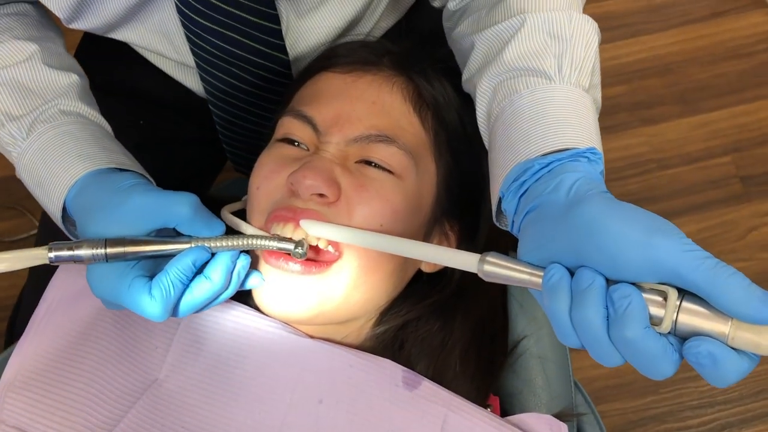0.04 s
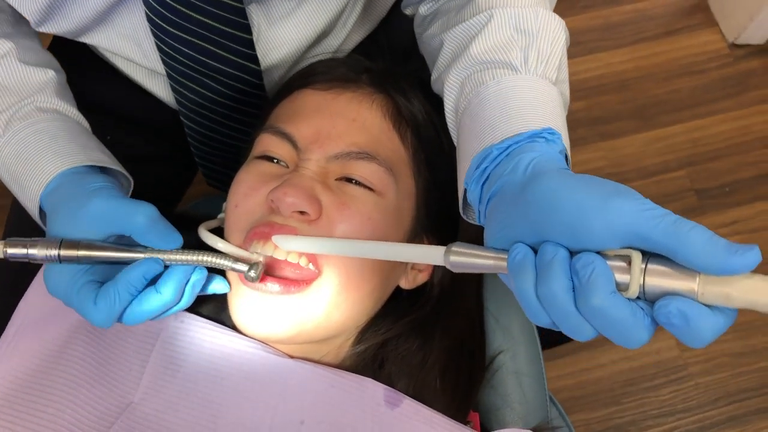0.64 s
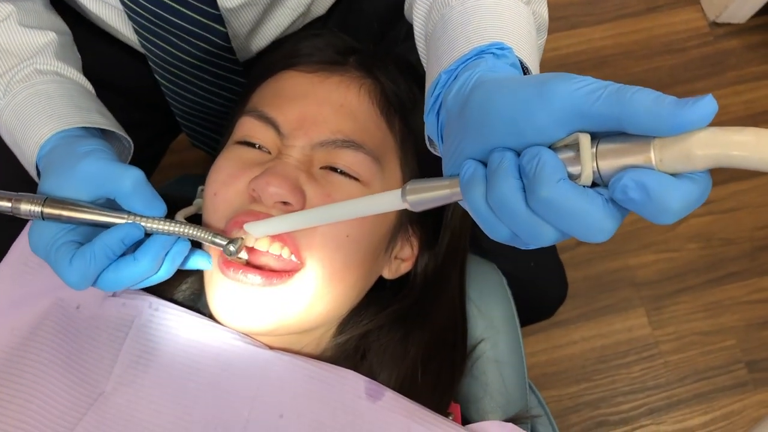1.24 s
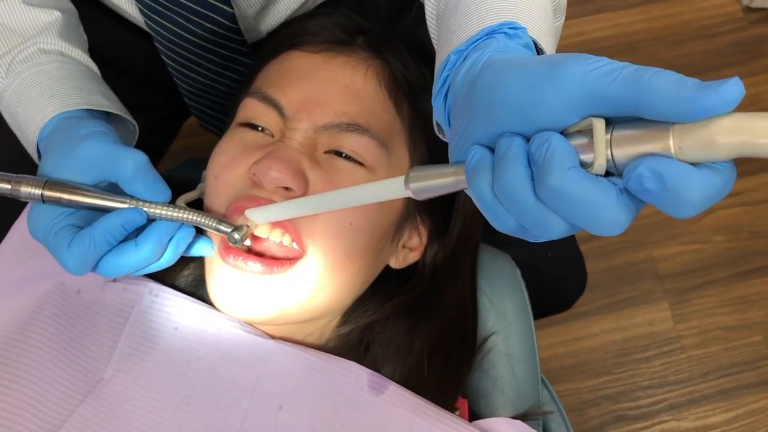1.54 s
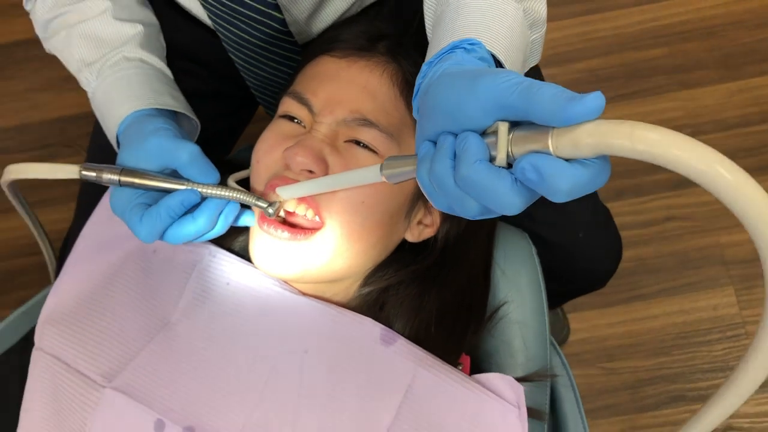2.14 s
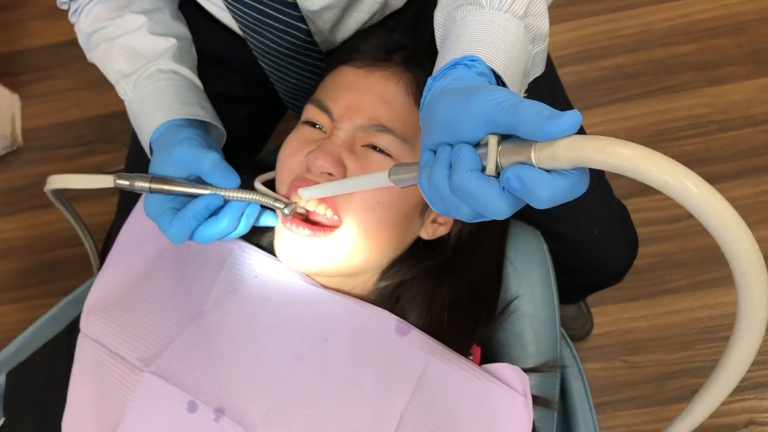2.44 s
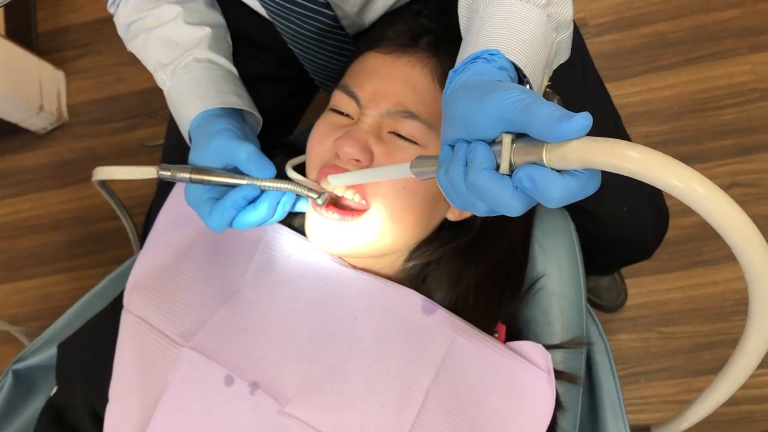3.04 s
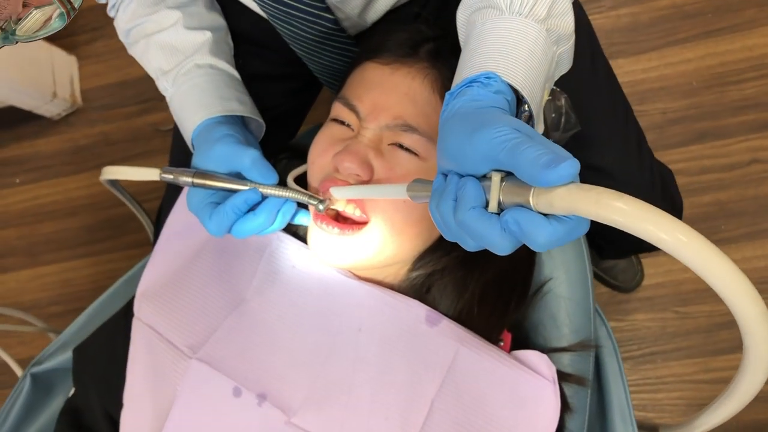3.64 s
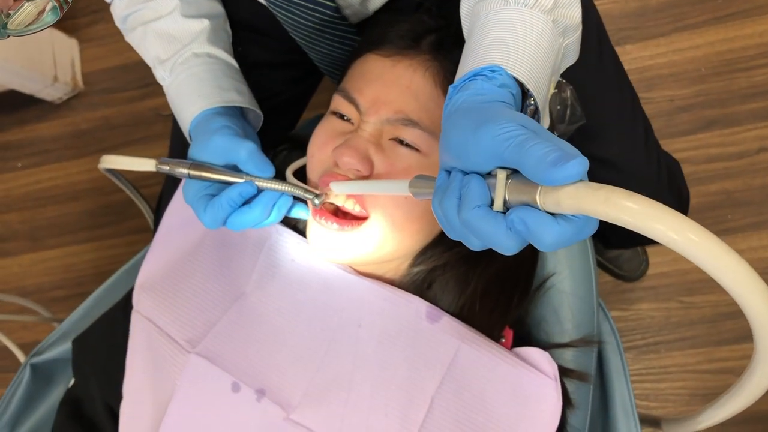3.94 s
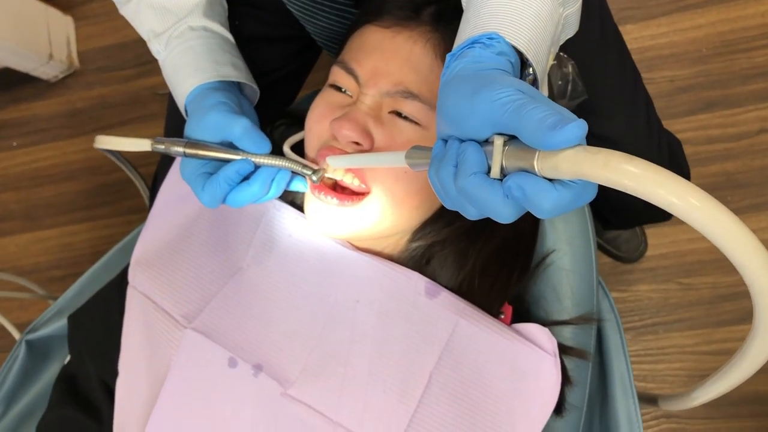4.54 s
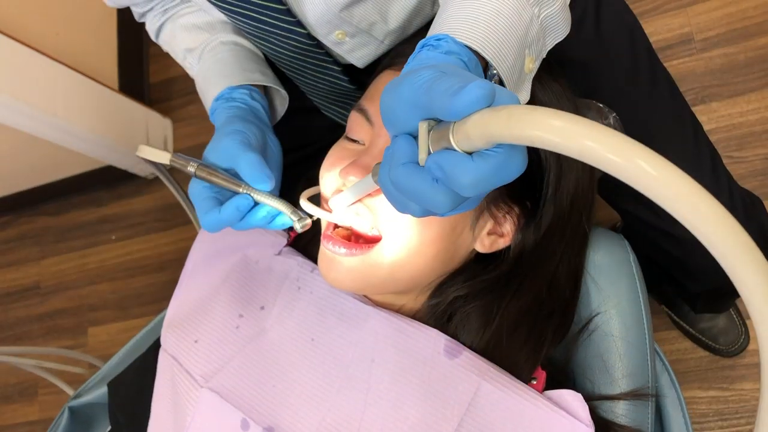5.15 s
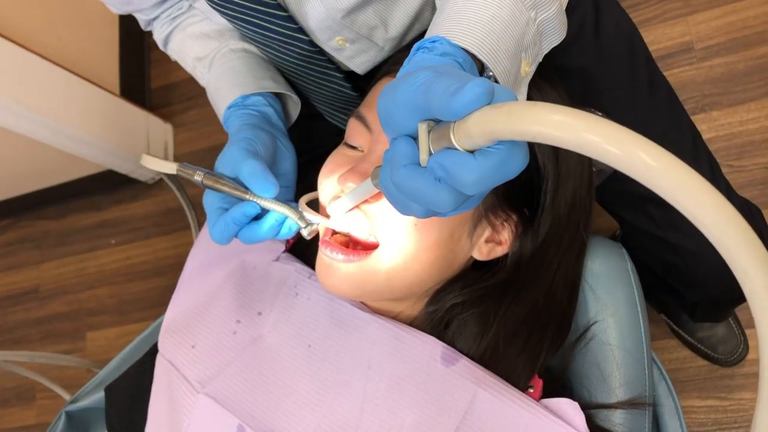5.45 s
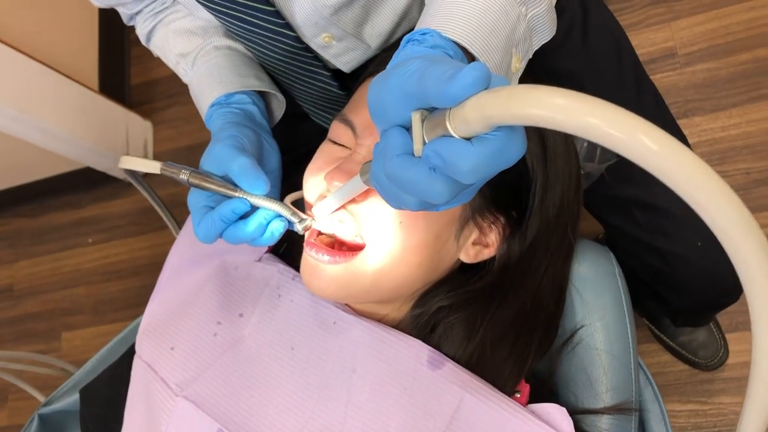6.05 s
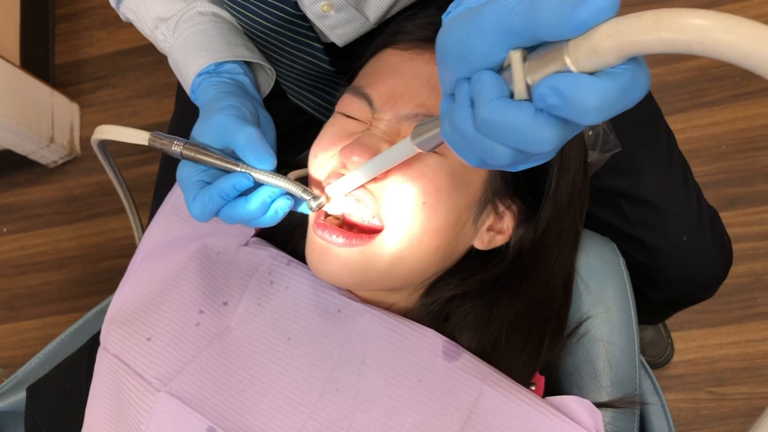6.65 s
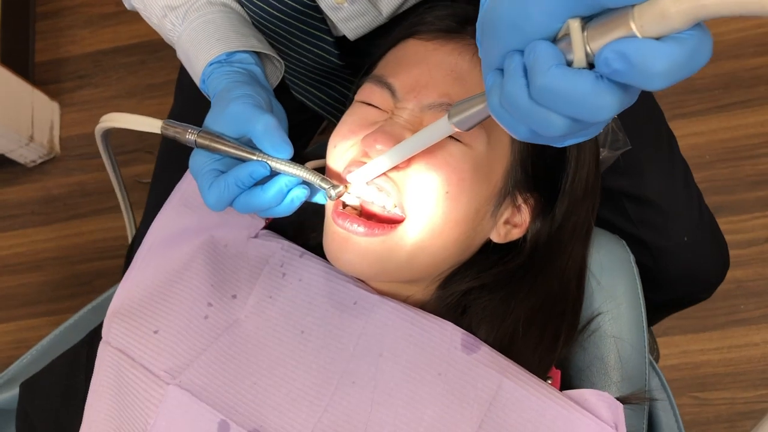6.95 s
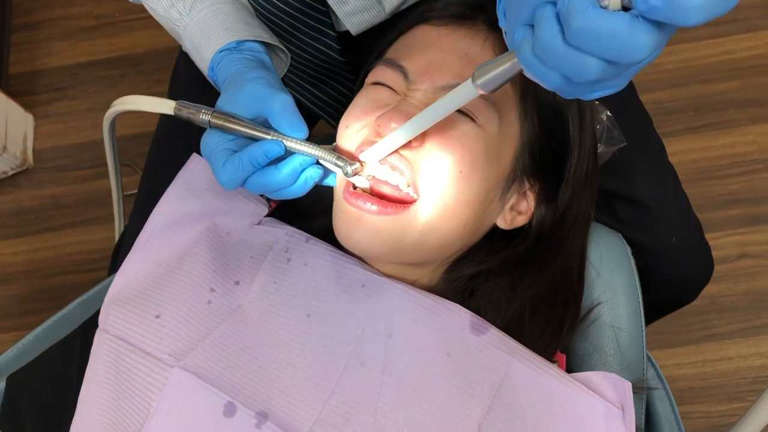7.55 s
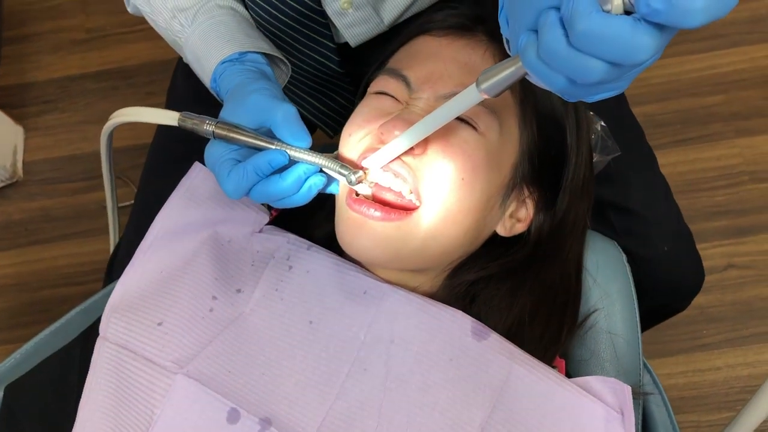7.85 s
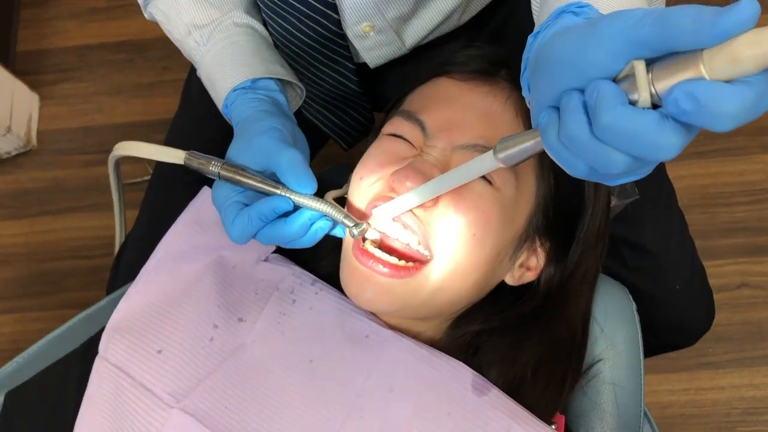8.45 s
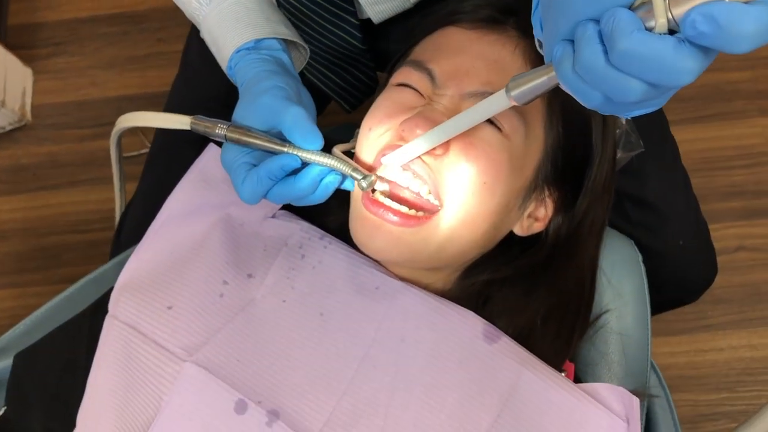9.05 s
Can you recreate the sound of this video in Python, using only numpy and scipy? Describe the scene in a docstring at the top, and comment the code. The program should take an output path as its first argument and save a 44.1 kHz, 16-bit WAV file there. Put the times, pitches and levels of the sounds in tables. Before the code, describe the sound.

From the start, a dental drill whines at a very high pitch close to the microphone, grinding glue off teeth in quick brushing strokes that each make the pitch sag. Beside it a suction tip hisses continuously, with faint whistles, tiny droplet ticks and short saliva slurps near 0.7 and 4.3 seconds. At about 4.8 seconds the drill stops and the tip settles against the lip, turning the hiss into a lower, hollow roar with a faint pump throb in the hose. At 5.6 seconds the drill spins up with a fast rising whine, stays thin and faint, then grows clearer around 7 seconds. Just after 8 seconds the tip comes free with a soft hoot and wet slurps. The brighter hiss returns and the drill strokes carry on until the end, a little past 9 seconds. Ventilation hums quietly throughout in the small clinic room.

```python
"""A small dental clinic room, a phone microphone close to the mouth. In front, an air turbine grinds
glue off teeth, its whine sagging at every stroke of the bur. Beside it a suction tip hisses and slurps.
Midway the drill lifts off and spins up again, and for about three seconds the tip lies against the lip,
where it roars lower and the pump throbs through the hose. Further off, ventilation hums."""
import sys
import numpy as np
from scipy import signal
from scipy.fft import rfft, irfft
from scipy.io import wavfile
from scipy.ndimage import uniform_filter1d

SR = 44100
rng = np.random.default_rng(int(sys.argv[2]) if len(sys.argv) > 2 else 0)


def dump_mix(stems):
    """Bounce the given channels to the path in sys.argv[1] as a 16-bit WAV at rate SR."""
    frames = np.atleast_2d(stems).T  # one column per channel
    limited = np.clip(frames, -1, 1)  # hard clip at full scale
    pcm = np.round(limited * 32767).astype(np.int16)
    wavfile.write(sys.argv[1], SR, pcm)


N = 409688
TIME = np.arange(N) / SR
FRAME_TIMES = np.arange(N // 256 + 5) * 256 / SR
BIN_HZ = np.fft.rfftfreq(1024, 1 / SR)

LIFT_S, RESTART_S = 4.822, 5.585  # the drill lifts off, then starts again from rest
LIP_FROM_S, LIP_UNTIL_S = 4.824, 8.063  # the suction tip lies against the lip

# Levels in the tables are relative; each source adds its own trim.
# steady pressure of the bur on the tooth, one table a pass: time_s, drag_hz, whine_db
FIRST_PASS = [(0, 1760, -19.5), (.33, 1370, -23.5), (.59, 1630, -10), (.65, 230, -28), (1.12, 170, -18),
              (1.17, 240, -26), (1.5, 590, -30), (1.72, 440, -19.5), (1.92, 580, -34), (2.55, 740, -35),
              (2.82, 120, -28), (3.3, 240, -29.5), (3.55, 200, -37.5), (3.71, 0, -26), (3.8, 180, -39),
              (4.04, 130, -32), (4.2, 420, -26), (4.82, 320, -30)]
SECOND_PASS = [(6.1, 60, -55), (6.5, 480, -48), (6.85, 90, -45), (6.94, 130, -25), (7.02, 260, -37),
               (7.3, 441, -30), (8.1, 490, -27.5), (8.72, 560, -31), (9.29, 140, -26.5)]
# brushing strokes of the bur, about eight a second: start_s, length_s, added_drag_hz, swell_db
BUR_STROKES = [(-0.049, 0.058, 323, 2), (0.085, 0.072, 644, 4.0), (0.233, 0.065, 520, 2),
               (0.333, 0.075, 840, 0.5), (0.45, 0.09, 845, -1), (0.552, 0.077, 840, -2.5),
               (1.143, 0.045, 980, -6.0), (1.248, 0.066, 302, 1.0), (1.371, 0.065, 510, 0.0),
               (1.74, 0.059, 360, -0.5), (1.839, 0.057, 400, 4.5), (1.947, 0.056, 630, 10.0),
               (2.043, 0.066, 500, 10.5), (2.173, 0.078, 1150, 7.5), (2.314, 0.061, 600, 5.0),
               (2.434, 0.07, 1030, 5.0), (2.561, 0.06, 1320, 1.5), (2.697, 0.068, 870, 2.0),
               (2.837, 0.073, 710, 4.5), (2.952, 0.067, 880, 6.0), (3.067, 0.07, 920, 6),
               (3.21, 0.056, 770, 7.5), (3.332, 0.065, 500, 6.0), (4.069, 0.067, 490, 9.5),
               (4.15, 0.063, 200, 5), (4.29, 0.066, 190, 6.5), (4.386, 0.063, 550, 9.5),
               (4.512, 0.05, 390, 10.5), (4.632, 0.062, 610, 11.5), (4.761, 0.066, 1010, 12.5),
               (7.863, 0.063, 99.7, 5.5), (8.196, 0.063, 230, 4.5), (8.352, 0.055, 690, 0.5),
               (8.423, 0.055, 640, 1.5), (8.548, 0.107, 900, 2.0), (8.68, 0.075, 960, 3.0),
               (8.793, 0.074, 780, -2.0), (8.911, 0.071, 890, 2.5), (9.026, 0.074, 660, 4.0),
               (9.177, 0.058, 790, 2.0)]
# how strongly the drill head radiates the blade tone: pitch_hz, level_db
HEAD_RESPONSE = [(3000, -52), (5200, -31), (6320, -20.5), (8800, -26), (10300, -21), (11200, -12),
                 (12500, -21), (14400, -10), (15600, -10), (17500, -24)]
# moments when the shaft's faint note sings out: start_s, length_s, level_db
SHAFT_SWELLS = [(6.12, .14, -25.5), (6.3, .52, -28), (6.91, .1, -28), (7.08, .12, -27), (7.351, 0.098, -26),
                (7.842, .08, -25), (7.99, 0.067, -19.5)]

# two resonances of the tip, in the open and by the teeth: time_s, first_db, first_hz, second_db, second_hz
TIP_OPEN = [(0, -30, 3660, -36, 6600), (.6, -29.5, 3850, -34.5, 6540), (.82, -31.5, 4430, -30, 6320),
            (1.5, -29.5, 4000, -25.5, 6160), (2.3, -33.5, 3930, -27.5, 5600), (3, -33.5, 4030, -29.5, 5850),
            (4.1, -35.5, 3880, -35, 6440), (4.4, -30.5, 4100, -31.5, 6500), (4.82, -34, 3970, -33, 6050)]
TIP_AT_TEETH = [(8.19, -26, 4460, -34, 5850), (8.25, -26.5, 4540, -20.5, 7500),
                (8.6, -26.5, 4460, -26, 7250), (9.29, -26, 4560, -24.5, 7200)]
# resonances with the tip against the lip: time_s, cavity_db, tube_db, tube_hz
TIP_AT_LIP = [(4.83, -31.5, -28, 3050), (5.35, -30.5, -27, 2950), (5.65, -30, -25.5, 3130),
              (5.95, -30, -30, 3080), (6.5, -29.3, -29, 2880), (6.86, -28, -26.5, 2760),
              (7.15, -28, -27.5, 2920), (7.5, -26, -29, 2974), (8.05, -25.5, -31, 2910)]
# higher resonances of the tube at the lip: pitch_hz, width_hz, level_db
TUBE_OVERTONES = [(4240, 350, -8), (4940, 440, -14), (6330, 710, -5.5), (8220, 400, -6), (9350, 860, -3),
                  (11200, 300, -15), (12000, 250, -22), (12700, 250, -22), (13500, 300, -21),
                  (14200, 600, -7)]
# air rushing at the tip and the drill head: time_s, level_db
AIR_LEVEL = [(0, -25.5), (1.5, -26.5), (2.9, -29), (3.9, -28), (4.8, -28), (4.86, -29.5), (5.6, -30),
             (5.74, -27.5), (6, -25.5), (6.4, -23), (7.8, -21.5), (8.05, -23.5), (8.07, -28.5), (8.27, -26),
             (8.55, -27), (9.29, -27.5)]
# colour of that air in each position of the tip: frequency_hz, density_db
AIR_IN_OPEN = [(400, -31), (1100, -15), (1650, -21), (2000, -16), (3000, -5), (5000, -5.5), (8300, -4.5),
               (10000, -.5), (12500, 1), (13900, 2.5), (15300, 2), (15800, 0)]
AIR_AT_LIP = [(600, -32), (900, -40), (1100, -19.5), (3500, -4.5), (4200, -9), (4750, -2), (5200, -2),
              (5800, -1), (8000, 1), (9150, 0.5), (9650, 3.5), (10200, 1.5), (14500, 0.5), (15800, -0.5)]
AIR_AT_TEETH = [(400, -19), (1600, -19.5), (2000, -13), (3200, -9.5), (5500, 0), (8800, -3), (9700, 1),
                (11200, 2), (12400, 0), (13700, 4), (15300, 6), (15800, -0.5)]
# whistles that catch at the rim of the tip: start_s, end_s, pitch_hz, width_hz, level_db
RIM_WHISTLES = [(-.1, .64, 6460, 130, -33), (1, 1.6, 4270, 150, -38), (4.85, 5.6, 6400, 221, -36),
                (7.5, 8.049, 9620, 150, -32.5), (8.07, 8.21, 5800, 100, -42), (8.07, 9.35, 4830, 70, -38),
                (8.92, 9.25, 4420, 130, -32)]
# saliva drawn through the tip: start_s, length_s, level_db, resonance_hz
SALIVA_SLURPS = [(0.644, 0.1, -25.5, 4300), (0.663, 0.039, -28, 6300), (4.27, 0.24, -28, 6900),
                 (8.213, 0.12, -22, 7600), (8.22, .11, -28, 5200), (8.43, .07, -23.5, 7500),
                 (8.445, .011, -20, 7400)]
# a soft hoot as the tip comes free: time_s, pitch_hz, level_db
RELEASE_HOOT = [(8.11, 179, -57), (8.18, 193, -44), (8.25, 194, -56)]

# a faint machine tone, an octave below the high hum, while the tip is choked: time_s, pitch_hz, level_db
FAINT_MACHINE_TONE = [(6.7, 937, -60), (7.2, 937, -51.5), (8.06, 936, -52)]
# rumble of the choked hose, and of the ventilation: frequency_hz, density_db
HOSE_SPECTRUM = [(20, -28), (40, -17), (60, -5), (85, -2), (110, 1), (180, -3.5), (330, -0.5), (500, -25),
                 (1500, -39)]
VENT_SPECTRUM = [(25, -48), (60, -23), (100, -11), (140, -5.5), (165, -2), (195, -3.5), (230, 7.5),
                 (270, -5.5), (350, 4), (420, 0.5), (650, 0.5), (850, -4.5), (1300, -6.5), (1700, -14.5),
                 (4000, -16)]
# steady tones of the pump through the hose, and of the room's machines: pitch_hz, level_db
PUMP_TONES = [(59.2, -63), (118.4, -55), (177.6, -54)]
MACHINE_TONES = [(118.4, -62.5), (238, -59), (355.3, -58.5), (501, -63.5), (640.6, -58), (1152, -62.5),
                 (1405, -62), (1642, -70), (1879, -56), (2293, -73)]
# echoes off surfaces near the microphone: delay_s, level_db
EARLY_ECHOES = [(.0013, -41), (.0034, -32), (.0058, -19), (.0087, -18.5), (0.0129, -21)]


def drill():
    """Close up, one rotor gives three tones: the whine, the shaft an octave lower and the blade tone."""
    hz, db = rotor()
    first = amp(0.1) * grinding(hz, db, bite_db=-0.5, flutter_db=1.5, blur_db=-39)
    second = amp(-1.5) * grinding(hz, db, bite_db=1, flutter_db=3.2, blur_db=-31)
    whine = first * during(-1, LIFT_S, .006) + second * during(6.8, np.inf, .1)
    return whine + blade_tone(hz / 2) + shaft_note(hz / 2)


def rotor(free_hz=14940, lag_s=.06, spin_up_s=.335):
    """Pitch and level of the whine: each stroke drags the rotor down, and the speed lags the load."""
    drag_hz, db = curves(FIRST_PASS + SECOND_PASS, TIME)
    for start, length, stroke_hz, swell_db in BUR_STROKES:
        touch = during(start, start + length, fade_s=.025)
        gap = 1 / (1 + ((TIME - start + .018) / .011) ** 2) ** 2  # the bur hangs clear before a stroke
        drag_hz = drag_hz + stroke_hz * touch
        db = db + swell_db * touch - 2 * gap
    inertia = np.exp(-1 / (lag_s * SR))
    sag_hz = signal.lfilter([1 - inertia], [1, -inertia], drag_hz - drag_hz[0]) + drag_hz[0]
    spin = np.where(TIME < RESTART_S, 1, np.tanh((TIME - RESTART_S) / spin_up_s))
    return spin * (free_hz - sag_hz), db


def grinding(hz, db, bite_db, flutter_db, blur_db):
    """The whine shifts in level as the bur bites and the rotor slows; exhaust air blurs it."""
    slowing = -np.gradient(hz) * SR  # Hz a second
    whine = sine(hz, db + bite_db * np.tanh(slowing / 4000), jitter=.00077, flutter_db=flutter_db)
    exhaust = turbulence(peak(np.interp(FRAME_TIMES, TIME, hz), 450), patchy_db=1.5)
    return whine + amp(blur_db) * exhaust


def blade_tone(shaft_hz, blades=6):
    """At the restart the tone of the passing blades shoots up out of hearing and rings on briefly."""
    hz = blades * shaft_hz
    sweep = sine(hz, .5, jitter=.0041, flutter_db=1.5) * colour(HEAD_RESPONSE, hz)
    sweep *= (hz < SR / 2) * during(RESTART_S, np.inf, .006)
    return sweep + amp(-13) * room(sweep, t60_s=.14)


def shaft_note(shaft_hz):
    """After the restart the shaft sounds faintly at its turning rate, and now and then sings out."""
    faint = amp(-33) * during(5.78, LIP_UNTIL_S, .04)
    swells = sum(amp(db) * during(start, start + length, .037) for start, length, db in SHAFT_SWELLS)
    return (faint + swells) * sine(shaft_hz, -3, jitter=.00306, flutter_db=2.5)


def suction(at_lip):
    """Beside the drill the tip draws air: first in the open, then against the lip, then by the teeth."""
    in_open = np.sqrt(during(-1, LIP_FROM_S, .008))
    at_teeth = np.sqrt(during(LIP_UNTIL_S, np.inf, .0092))
    open_hiss = free_suction(TIP_OPEN, widths_hz=(620, 400), skirt_db=-2, waver=.013)
    teeth_hiss = free_suction(TIP_AT_TEETH, widths_hz=(210, 580), skirt_db=-6.5, waver=.018)
    flow = in_open * (open_hiss + rush(AIR_IN_OPEN))
    flow += at_lip * (lip_suction() + rush(AIR_AT_LIP))
    flow += at_teeth * (teeth_hiss + rush(AIR_AT_TEETH))
    return flow * amp(.5 + .3 * drift(25))  # never quite even


def free_suction(rows, widths_hz, skirt_db, waver):
    """Air entering the free tip excites two resonances that shift with the gap to the teeth."""
    first_db, _, second_db, _ = curves(rows, TIME)
    _, first_hz, _, second_hz = curves(rows, FRAME_TIMES)
    first_hz *= 1 + waver * np.interp(FRAME_TIMES, TIME, drift(14))  # wavers with the hand
    first = turbulence(resonance(first_hz, widths_hz[0], 820, skirt_db), patchy_db=.9)
    second = turbulence(resonance(second_hz, widths_hz[1], 950, skirt_db), patchy_db=2.1)
    return amp(first_db + .5) * first + amp(second_db - 2) * second


def lip_suction():
    """With the tip against the lip, the mouth cavity and the tube roar."""
    cavity_db, tube_db, _ = curves(TIP_AT_LIP, TIME)
    tube_hz = curves(TIP_AT_LIP, FRAME_TIMES)[2]
    cavity = turbulence(resonance(2174, 320, skirt_hz=580, skirt_db=-6), patchy_db=.85)
    deep_mouth = turbulence(peak(1350, 250), patchy_db=1.5)
    lowest_mode = amp(2.5) * resonance(tube_hz, 137, skirt_hz=490, skirt_db=-4)
    overtones = np.sqrt(sum((amp(db) * peak(hz, width / 2)) ** 2 for hz, width, db in TUBE_OVERTONES))
    tube = turbulence(np.hypot(lowest_mode, overtones), patchy_db=.65)
    return amp(cavity_db - .8) * cavity + amp(-44.5) * deep_mouth + amp(tube_db + 1.75) * tube


def rush(spectrum):
    """Broad hiss of fast air."""
    return amp(curves(AIR_LEVEL, TIME)[0] + 7) * turbulence(colour(spectrum), patchy_db=1)


def edge_tones():
    """Air shearing over the rim of the tip now and then locks into a fuzzy whistle."""
    return sum(amp(db) * turbulence(peak(hz, width), patchy_db=0) * during(start, end, .078)
               for start, end, hz, width, db in RIM_WHISTLES)


def saliva(drops_per_s=1800, width_hz=1100):
    """Each slurp is a swarm of droplets ticking in a resonance of the tip."""
    out = np.zeros(N)
    for start, length, db, hz in SALIVA_SLURPS:
        n = round(length * SR)
        drops = rng.standard_normal(n) * (.45 + (rng.random(n) < drops_per_s / SR))
        ring = signal.lfilter(*signal.iirpeak(hz, hz / width_hz, fs=SR), drops)
        slurp = amp(db) * unit_rms(ring) * signal.windows.tukey(n, .5)
        span = out[round(start * SR):][:n]
        span += slurp[:len(span)]
    return out


def spatter(drops_per_s=22):
    """Single droplets snap against the wall of the tip."""
    size_db = -16 + 2 * np.minimum(rng.exponential(1, N), 3)
    hits = amp(size_db) * (rng.random(N) < drops_per_s / SR)
    t = np.arange(40) / SR
    snap = np.exp(-t / .00013) * (np.sin(2 * np.pi * 7000 * t) + np.sin(2 * np.pi * 12500 * t)) / 2
    return signal.oaconvolve(hits, snap)[:N]


def choked_hose():
    """The choked hose rumbles, and the pump throbs through it."""
    return amp(-46.5) * rumble(HOSE_SPECTRUM) + hum(PUMP_TONES, waver_hz=2.33)


def ventilation():
    """Well behind the mouth, moving air rumbles and the room's machines hum."""
    return amp(-42) * rumble(VENT_SPECTRUM) + hum(MACHINE_TONES, waver_hz=2.38)


def with_echoes(x):
    """Face, chair and floor return early echoes that ripple the hiss."""
    return x + sum(amp(db) * np.interp(TIME - delay, TIME, x, left=0) for delay, db in EARLY_ECHOES)


def room(x, t60_s=.19):
    """The short diffuse tail of a small clinic room."""
    t = np.arange(SR // 2) / SR
    tail = rng.standard_normal(len(t)) * amp(-60 * t / t60_s) * (t > .004)
    return signal.fftconvolve(x, tail / np.linalg.norm(tail))[:N]


def short_tone(rows, jitter, flutter_db):
    """A tone that sounds from the first row of its table to the last."""
    return sine(*curves(rows, TIME), jitter, flutter_db) * during(rows[0][0], rows[-1][0], .006)


def sine(hz, db, jitter, flutter_db):
    """A tone on curves of pitch and level, both trembling."""
    turns = np.cumsum(hz * (1 + jitter * drift(120))) / SR
    return np.sqrt(2) * amp(db + flutter_db * drift(40)) * np.sin(2 * np.pi * turns)


def hum(tones, waver_hz):
    """Machine tones that waver and swell a little."""
    out = np.zeros(N)
    for hz, db in tones:
        gain = np.sqrt(2) * amp(db + 2.5 * drift(3.4))
        turns = np.cumsum(hz + waver_hz * drift(7.3)) / SR
        out += gain * np.sin(2 * np.pi * turns)
    return out


def turbulence(shape, patchy_db):
    """Noise of rms 1 with the given spectrum, broken into brief patches by eddies."""
    real, imag, eddies = rng.standard_normal((3, len(FRAME_TIMES), len(BIN_HZ)))
    eddies = uniform_filter1d(eddies, size=8, axis=0)
    eddies = unit_rms(uniform_filter1d(eddies, size=16, axis=1))
    spectra = (real + 1j * imag) * shape * amp(patchy_db * eddies)
    return unit_rms(signal.istft(spectra.T, nperseg=1024, noverlap=768)[1][:N])


def rumble(spectrum):
    """Steady noise of rms 1 with the given spectrum."""
    gain = colour(spectrum, np.fft.rfftfreq(N, 1 / SR))
    return unit_rms(irfft(rfft(rng.standard_normal(N)) * gain, N))


def drift(hz):
    """Random wander of rms 1, up to about hz."""
    f = np.fft.rfftfreq(N, 1 / SR)
    return unit_rms(irfft(rfft(rng.standard_normal(N)) / (1 + (f / hz) ** 4), N))


def resonance(hz, width_hz, skirt_hz, skirt_db):
    """A narrow core on wide skirts: the resonance is blurred by the flow through it."""
    return np.hypot(peak(hz, width_hz), amp(skirt_db) * peak(hz, skirt_hz))


def peak(hz, width_hz):
    """Gain of a steep-sided resonance, still or moving from frame to frame."""
    return 1 / (1 + ((BIN_HZ - np.reshape(hz, (-1, 1))) / width_hz) ** 2)


def colour(spectrum, hz=BIN_HZ):
    """Gain of a spectrum at the frequencies hz."""
    f, db = np.transpose(spectrum)
    return amp(np.interp(np.log(hz + 1), np.log(f), db))


def curves(rows, t):
    """The columns of a table of curves at times t."""
    times, *columns = np.transpose(rows)
    return [np.interp(t, times, column) for column in columns]


def during(start_s, end_s, fade_s):
    """1 between two times, with short ramps."""
    return np.clip(np.minimum(TIME - start_s, end_s - TIME) / fade_s + .5, 0, 1)


def amp(db):
    """Decibels to gain."""
    return 10 ** (np.asarray(db) / 20)


def unit_rms(x):
    """Scales to rms 1."""
    return x / np.sqrt(np.mean(x ** 2) + 1e-20)


def scene():
    """Drill and suction close to the microphone, ventilation behind; alike in both channels."""
    at_lip = np.sqrt(during(LIP_FROM_S, LIP_UNTIL_S, .0067))
    tip = suction(at_lip) + edge_tones() + saliva() + spatter()
    small_opening = signal.butter(2, 400, "highpass", fs=SR)  # radiates no bass
    mouth = drill() + with_echoes(signal.lfilter(*small_opening, tip))
    machine_tone = short_tone(FAINT_MACHINE_TONE, jitter=.001, flutter_db=0)
    hoot = short_tone(RELEASE_HOOT, jitter=.034, flutter_db=7)
    hose = at_lip * choked_hose()
    background = amp(-2.5 * at_lip) * ventilation()  # dips while the tip is at the lip
    return np.tile(mouth + amp(-17.5) * room(mouth) + hoot + hose + machine_tone + background, (2, 1))


def record(dry, headroom=.92, cutoff_hz=15790):
    """The phone microphone's headroom and band limit."""
    lowpass = signal.firwin(701, cutoff_hz, window=("kaiser", 9), fs=SR)
    return signal.oaconvolve(np.clip(dry, -headroom, headroom), lowpass[None], "same")


dry = scene()
out = record(dry)
dump_mix(out)
```